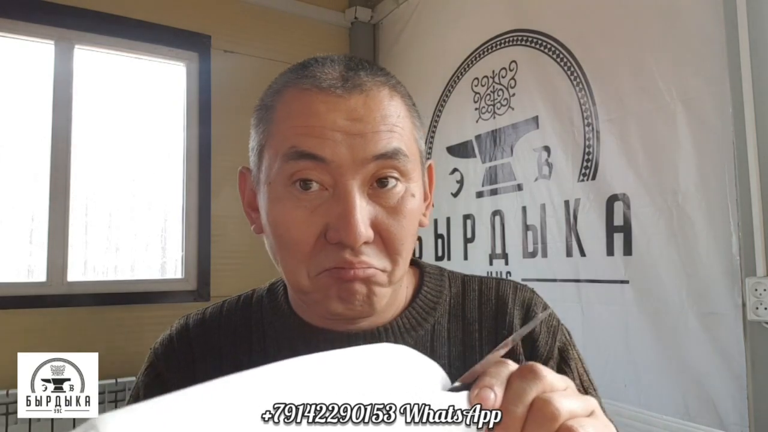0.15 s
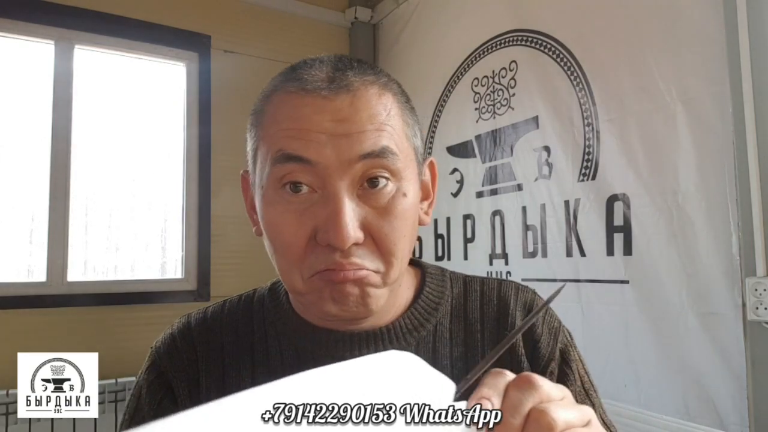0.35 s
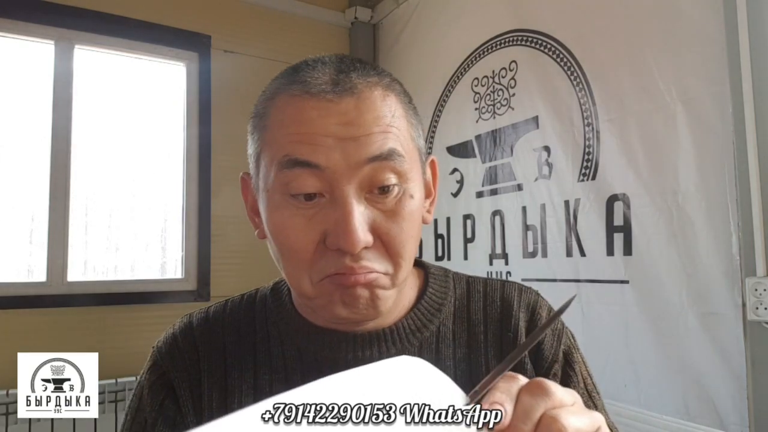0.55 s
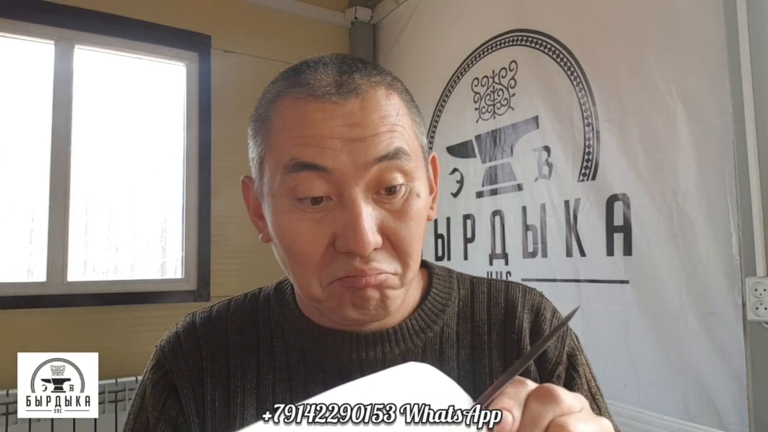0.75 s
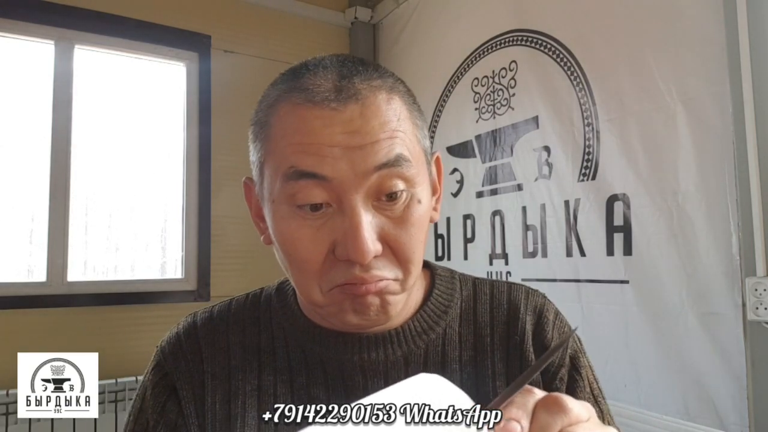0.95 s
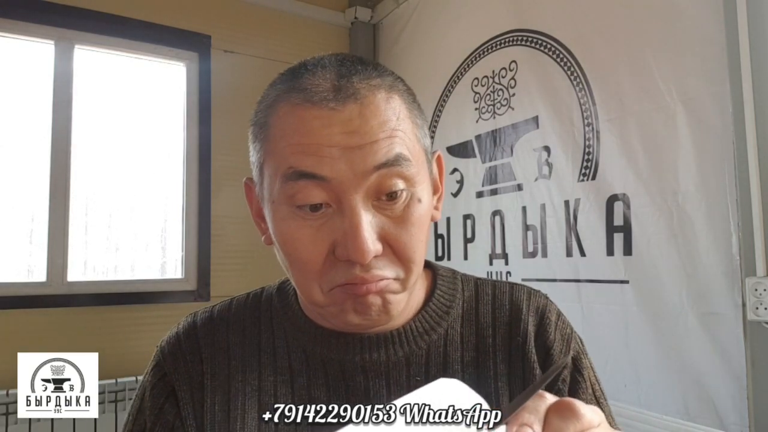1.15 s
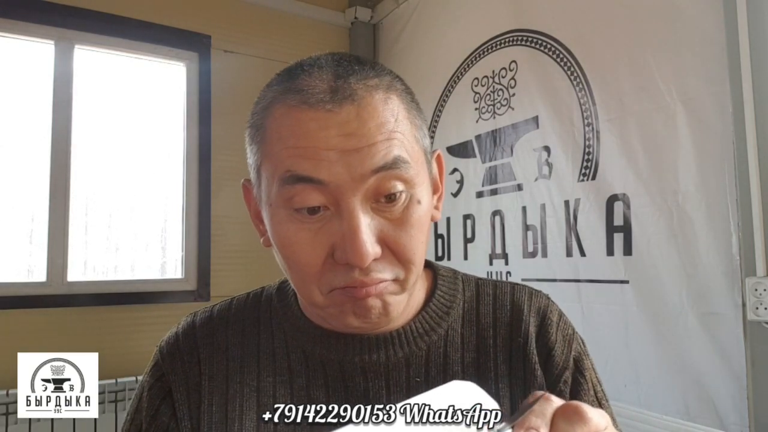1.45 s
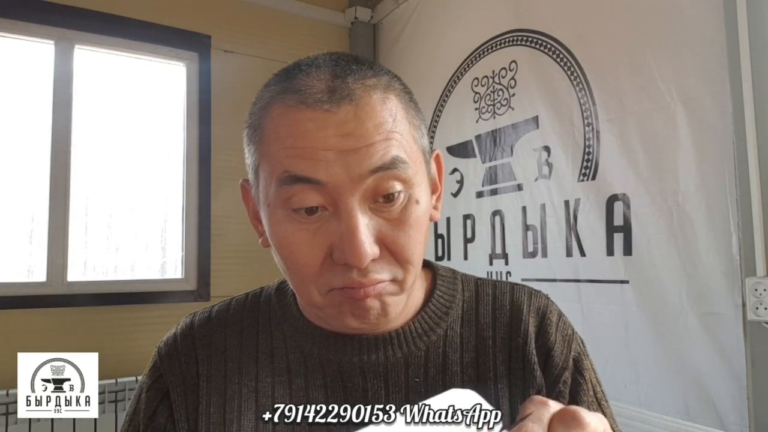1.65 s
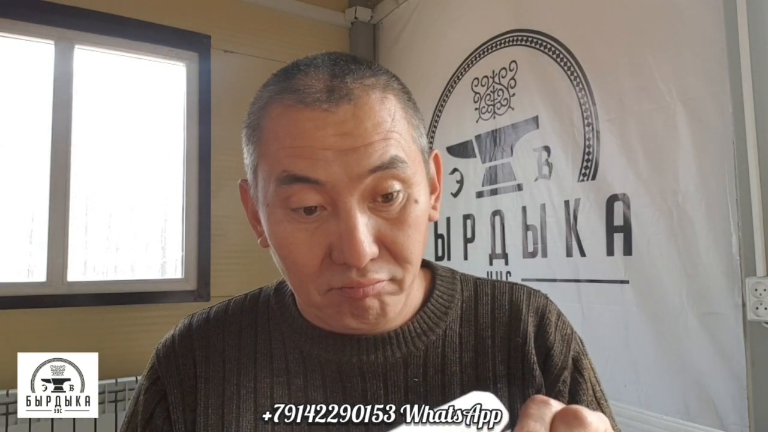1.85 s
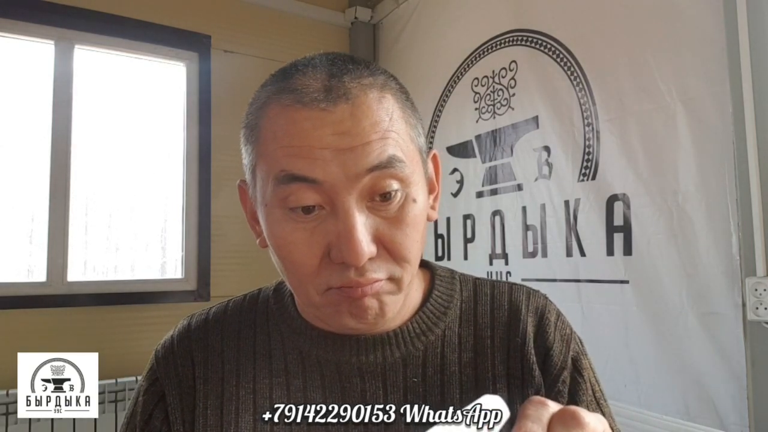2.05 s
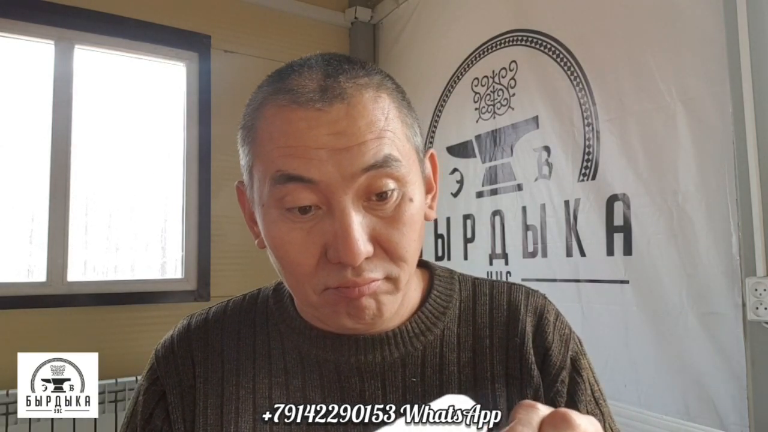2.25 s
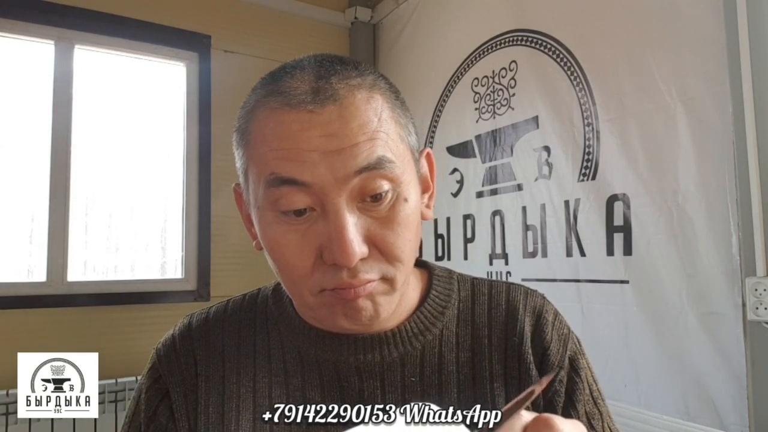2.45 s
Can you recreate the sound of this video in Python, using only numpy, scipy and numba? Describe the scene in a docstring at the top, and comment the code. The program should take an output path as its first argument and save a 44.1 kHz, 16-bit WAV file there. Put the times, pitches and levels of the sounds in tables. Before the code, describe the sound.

A knife blade skids on a held paper sheet, snaps off, then slices through in a long stuttering stroke

```python
"""Knife through held paper

A knife is tried on a hand-held sheet of paper in a small room, close and a little to the left.
The blade skids along the edge and snaps off it, then slices through in one long stroke that stutters halfway.
Random clicks of parting fibres drive the sheet's resonances; skids, rubs and flicks are filtered friction
and bursts of noise, with soft knocks of the hand. Decaying noise makes the room, over a low rumble."""
import sys
import numpy as np
from scipy import signal
from scipy.fft import rfft, irfft
from scipy.io import wavfile
from numba import njit

SR = 44100
rng = np.random.default_rng(int(sys.argv[2]) if len(sys.argv) > 2 else 0)


def to_wav(s):
    """Save 16-bit WAV."""
    ch = np.atleast_2d(s).T  # columns
    pcm = np.round(np.clip(ch, -1, 1) * 32767)  # PCM
    wavfile.write(sys.argv[1], SR, pcm.astype(np.int16))


N = 114660  # length [samples]
MID_TO_SIDES = np.array([[1], [-1]])  # opposite signs in left and right


def undb(db):
    """Amplitude ratio of a level in decibels."""
    return 10 ** (np.asarray(db) / 20)


def unit(x):
    """Normalisation to an rms value of 1."""
    return x / np.sqrt(np.mean(x ** 2))


def clock():
    """Time axis in seconds."""
    return np.arange(N) / SR


def curve(table, axis=1):
    """Linear interpolation in time of one column of a table."""
    rows = np.array(table)
    return np.interp(clock(), rows[:, 0], rows[:, axis])


def freqs():
    """Frequency axis in Hz of the zero-padded spectrum, kept above zero."""
    return np.maximum(np.arange(N + 1) * SR / (2 * N), 1)


def filt(x, gain):
    """Linear filtering: the spectrum is multiplied by a frequency response."""
    return irfft(rfft(x, 2 * N, axis=-1) * gain, axis=-1)[..., 0:N]


def colour(points):
    """Minimum-phase response through (frequency [Hz], level [dB]), by folding the cepstrum."""
    hz, db = np.array(points).T
    level_db = np.interp(np.log(freqs()), np.log(hz), db)
    cepstrum = irfft(np.log(undb(level_db)))
    cepstrum[1:N] *= 2
    cepstrum[N + 1:] = 0
    return np.exp(rfft(cepstrum))


def resonance(hz, width_hz):
    """Response of a damped resonator, with gain 1 at its centre."""
    return 1 / (1 + 1j * (freqs() ** 2 - hz ** 2) / (freqs() * width_hz))


def low_cut(hz, order=8):
    """Zero-phase high-pass response with a steep slope."""
    return 1 / np.sqrt(1 + (hz / freqs()) ** order)


def walk(rate):
    """Slow random modulation of rms 1: random values, rate per second, joined by lines."""
    return unit(np.interp(clock() * rate, np.arange(4096), rng.standard_normal(4096)))


def pan(x, db):
    """Intensity stereophony: left exceeds right by db, with the mean gain held at 1."""
    gains = undb(MID_TO_SIDES * db / 2)
    return x * gains / gains.mean(axis=0)


def gate(start, length, attack, release):
    """Envelope of a linear rise centred on the start, a hold and an exponential decay."""
    t = clock() - start
    rise = np.clip(t / attack + .5, 0, 1)
    return rise * np.exp(-np.maximum(t - length, 0) / release)


# The sheet radiates treble from many separate patches, so the sides agree less as frequency rises
LIKENESS, LIKENESS_HZ = 0.52, 1940  # likeness at the lowest frequencies; frequency where it halves


def spread(pair):
    """Partial coherence: two unrelated signals become sides most alike in the bass."""
    alike = LIKENESS / (1 + freqs() / LIKENESS_HZ)
    middle = filt(pair[0], np.sqrt(1 + alike))
    side = filt(pair[1], np.sqrt(1 - alike))
    return middle + side * MID_TO_SIDES


def fibres(per_s, spread_db):
    """Shot noise: dense tiny clicks of uneven size as fibres catch and part."""
    sizes = undb(spread_db * np.minimum(rng.exponential(size=(2, N)), 4))
    clicks = rng.random((2, N)) < per_s / SR
    signs = np.sign(rng.standard_normal((2, N)))
    return unit(spread(clicks * sizes * signs))


@njit
def moving_band(x, hz, width):
    """State-variable resonator: a band-pass whose centre moves."""
    y, band, low = np.empty(len(x)), 0., 0.
    for i in range(len(x)):
        g, damping = np.tan(np.pi * hz[i] / SR), width / hz[i]
        v = (band + g * (x[i] - low)) / (1 + g * (g + damping))
        band, low, y[i] = 2 * v - band, low + 2 * g * v, damping * v
    return y


# Course of the rumble before its random swell: (time [s], level [dB])
RUMBLE_LEVEL = [(0, -68), (.15, -69), (.27, -61), (.37, -51), (.47, -70.5), (1.0, -67.5), (1.5, -66),
                (1.98, -70), (2.03, -58), (2.075, -70), (2.12, -60), (2.27, -65.5), (2.45, -65),
                (2.55, -64.5), (2.59, -54)]
# Spectrum of the rumble: (frequency [Hz], relative spectral level [dB per Hz])
RUMBLE_COLOUR = [(15, -20.5), (28, -15.5), (42, 2.5), (60, -6.5), (100, -18.5), (200, -33.5), (400, -32),
                 (1500, -64), (16000, -71)]
# Spectrum of the steady hiss: (frequency [Hz], relative spectral level [dB per Hz])
AIR_COLOUR = [(40, -7.5), (120, -3.5), (300, -22.5), (1000, -17), (4000, -21.5), (16000, -46)]
AIR_DB = -72.5


def rumble(swell_db=1.5, side_db=-11):
    """Amplitude-modulated low noise: a wavering rumble with a faint steady hiss above it."""
    mid, side = unit(filt(rng.standard_normal((2, N)), colour(RUMBLE_COLOUR)))
    swell = undb(curve(RUMBLE_LEVEL) + swell_db * walk(4.51))
    low = (mid + undb(side_db) * side * MID_TO_SIDES) * swell
    air = undb(AIR_DB) * unit(filt(spread(rng.standard_normal((2, N))), colour(AIR_COLOUR)))
    return pan(low, db=4.0) + pan(air, db=8.5)


# Light skids of the blade on the paper's edge:
# (start [s], end [s], level at start [dB], level at end [dB], low cut [Hz])
SKIDS = [(-.02, 0.051, -43.5, -53, 1000), (0.057, 0.162, -51, -50, 1030), (0.17, 0.334, -49, -47, 1010),
         (0.341, 0.41, -42, -53, 850), (0.412, 0.555, -60.5, -60, 1500), (0.544, 0.62, -69.5, -71, 1500),
         (0.612, 0.668, -58, -65, 1150), (0.673, 0.805, -65.5, -76, 1200), (2.136, 2.269, -67, -52.5, 2510),
         (2.273, 2.388, -57.5, -51, 2850), (2.39, 2.52, -63.5, -68.5, 5000),
         (2.486, 2.54, -55.5, -58.5, 7750), (2.543, 2.637, -60, -50.5, 5400)]
# Spectrum of the scratch before the low cut: (frequency [Hz], relative spectral level [dB per Hz])
SKID_COLOUR = [(300, 15), (1000, -7.5), (1600, -8), (2200, -4), (4200, -3.5), (6500, -2.5), (8500, -2.5),
               (11000, -3), (13500, -7.5), (16000, -7)]
SKID_PAN_DB = 6.5


def skids(attack_s=0.011, release_s=0.0043):
    """Sliding friction: the blade rides on the edge without biting, a fine scratch thinned by a low cut."""
    scratch = filt(fibres(per_s=7800, spread_db=3.5), colour(SKID_COLOUR)) * undb(1.05 * walk(90))
    out = 0
    for start, end, start_db, end_db, cut_hz in SKIDS:
        level = undb(np.interp(clock(), [start, end], [start_db, end_db]))
        touch = level * gate(start, end - start, attack_s, release_s)
        out = out + touch * unit(filt(scratch, low_cut(cut_hz)))
    return pan(out, SKID_PAN_DB)


# Rubs of the bending sheet, with one short burst just before the snap and faint narrow whistles:
# (start [s], length [s], level [dB], centre at start [Hz], centre at end [Hz], width [Hz])
RUBS = [(0, 0.04, -54.5, 1780, 1750, 700), (0.167, 0.052, -55, 1600, 2080, 980),
        (0.254, 0.078, -53.5, 1970, 1590, 980), (0.329, 0.025, -56, 1400, 2540, 600),
        (0.3495, 0.002, -37.5, 1410, 1500, 800), (0.393, 0.095, -60.5, 1700, 2200, 1200),
        (0.619, 0.041, -62.5, 1660, 1750, 650), (0.692, 0.046, -76.5, 1700, 1600, 650),
        (2.124, 0.205, -66.5, 2100, 2470, 1136), (2.204, 0.12, -72.5, 1480, 1570, 75),
        (2.337, 0.1, -72.5, 1720, 1840, 161), (2.376, 0.0088, -60.5, 2630, 2630, 50),
        (2.568, .04, -67, 3270, 3200, 1193)]


def rubs(attack_s=0.006, release_s=0.024, pan_db=7, judder_db=1):
    """Driven resonance: uneven clicks excite one band, wide or narrow, whose centre may glide."""
    grip = filt(fibres(per_s=5500, spread_db=4), low_cut(hz=985)) * undb(judder_db * walk(110))
    out = 0
    for start, length, db, start_hz, end_hz, width in RUBS:
        hz = np.interp(clock(), [start, start + length], [start_hz, end_hz])
        ring = unit(np.array([moving_band(side, hz, float(width)) for side in grip]))
        out = out + undb(db) * gate(start, length, attack_s, release_s) * ring
    return pan(out, pan_db)


# Snaps and flicks of the sheet: (time [s], level of the burst's drive [dB], decay time constant [s])
SNAPS = [(0.022, -54, 0.078), (0.3657, -24.5, 0.0036), (0.38, -45.5, 0.0033), (0.529, -55.5, 0.0058),
         (0.619, -60, 0.0066), (2.354, -55, 0.03), (2.385, -52.5, 0.0046)]
# Spectrum of a snap: (frequency [Hz], relative spectral level [dB per Hz])
SNAP_COLOUR = [(60, -12.5), (200, -15), (310, -27), (450, -12.5), (700, -8), (1000, -8.5), (1450, -2),
               (2400, -2), (3300, -4), (5200, -12), (6000, -16), (7500, -12), (8500, -27), (16000, -43)]
SNAP_HOLD_S, SNAP_PAN_DB = 0.0029, 5


def snaps(click_db=14):
    """Impulsive buckling: one sharp click, then a held and decaying burst as the sheet springs back."""
    t = clock()
    push, click = 0, 0
    for start, db, decay in SNAPS:
        fall = np.exp(-np.maximum(t - start - SNAP_HOLD_S, 0) / decay)
        push = push + undb(db) * (t >= start) * fall
        click = click + undb(db + click_db) * (np.arange(N) == int(start * SR))
    noise = unit(spread(np.sign(rng.standard_normal((2, N)))))
    crack = click + push * noise
    response = colour(SNAP_COLOUR)
    response = response / np.sqrt(np.mean(np.abs(response) ** 2))
    return pan(filt(crack, response), SNAP_PAN_DB)


# Soft knocks of the hand on the sheet: (time [s], level [dB])
KNOCKS = [(0.052, -68), (0.089, -73), (0.371, -49.5), (2.362, -64)]
KNOCK_HZ, KNOCK_WIDTH_HZ, KNOCK_DECAY_S = 431, 140, 0.022  # width of each of two equal resonators


def knocks():
    """Damped resonance: hollow low thuds of narrow noise with an exponential decay."""
    t = clock()
    push = sum(undb(db) * (t >= s) * np.exp(-np.abs(t - s) / KNOCK_DECAY_S) for s, db in KNOCKS)
    noise = spread(rng.standard_normal((2, N)))
    thud = unit(filt(noise, resonance(KNOCK_HZ, KNOCK_WIDTH_HZ) ** 2))
    return pan(push * thud, db=20)


BUNDLES_PER_S, BUNDLE_DB, BUNDLE_DECAY_S = 110, 1.5, 0.0012  # level against the steady tearing


def bundles():
    """Random relaxation: bundles of fibres give way, each a sudden, brief surge of the tearing."""
    breaks = (rng.random(N) < BUNDLES_PER_S / SR) * rng.random(N)
    surges = signal.lfilter([1], [1, -np.exp(-1 / (SR * BUNDLE_DECAY_S))], breaks)
    return unit(1 + undb(BUNDLE_DB) * surges)


FIBRES_PER_S, FIBRE_SPREAD_DB = 9000, 0.5
COLOUR_CHANGE_S = (1.45, 2.05)  # start and end of the change from early to late
MODES_DB, MODES_FADE_DB = -6.5, 7  # ring against sheet; it weakens by the fade as the cut frees the sheet
BITE_S, BITE_HZ = (0.95, 1.024), 1005  # the bass comes in as the blade goes deeper
RASP_DB, RASP_HZ = -1, 157  # the blade catches unevenly, shaking the sheet's resonances
JERK_ATTACK_S, JERK_RELEASE_S = 0.00096, 0.0031
CUT_PAN_DB, PAN_DRIFT_DB = 7.5, 3.5  # the blade moves towards the middle as it cuts
CUT_TRIM_DB = -1.5  # applied to body and hiss alike
# Force of the cut, before jerks and surges: (time [s], level [dB])
CUT_FORCE = [(.7, -100), (.78, -78), (.83, -61.5), (.95, -48.5), (1.005, -46.5), (1.05, -43), (1.14, -36.5),
             (1.18, -39.5), (1.215, -37), (1.3, -40), (1.41, -44.5), (1.503, -40.5), (1.518, -52),
             (1.56, -58), (1.672, -53.5), (1.693, -48), (1.73, -45.5), (1.815, -35), (1.865, -38),
             (1.89, -36), (1.905, -41), (1.94, -37), (1.975, -44), (2.005, -33.5), (2.024, -37.5),
             (2.038, -42), (2.065, -53.5), (2.1, -62), (2.2, -100)]
# Short jerks where the blade sticks and goes on: (start [s], length [s], added level [dB])
JERKS = [(1.021, 0.0099, -58), (1.144, 0.0022, -47), (1.53, 0.011, -45), (1.578, 0.016, -48),
         (1.63, 0.019, -51), (1.638, 0.015, -50), (1.841, .003, -47), (1.921, 0.0022, -42),
         (1.957, .003, -39.5), (1.969, .002, -46)]
# The sheet's colour early in the cut: (frequency [Hz], relative spectral level [dB per Hz])
SHEET_EARLY = [(100, -21), (250, -20), (450, -19.5), (750, -7.5), (1000, -4), (1600, -5), (3000, -6.5),
               (3700, -5.5), (4700, -2), (5600, -5.5), (6600, -5), (8800, -7), (13000, -7.5), (16000, -10)]
# The sheet's colour late in the cut: (frequency [Hz], relative spectral level [dB per Hz])
SHEET_LATE = [(100, 0), (290, -14), (430, -1.5), (700, -4), (1000, -3), (1600, 1.5), (2200, 0.5),
              (3000, 3.5), (4400, 7), (5700, 0), (7200, 3.5), (8700, -1.5), (9700, -3), (13500, -5.5),
              (16000, -5)]
# Resonances of the sheet: (centre [Hz], width [Hz], relative gain [dB])
SHEET_MODES = [(423, 37, -5), (980, 270, -3.5), (1610, 390, 6.5), (2250, 590, 13.5), (2870, 390, 8)]
# Sharp hiss at the cutting edge:
# (time [s], centre [Hz], level against the cut before the trim [dB], lean to the left [dB])
EDGE = [(.85, 10800, -9.5, 27), (1.12, 10200, -9.5, 21), (1.28, 11100, -6, 13), (1.38, 11600, -8, 13),
        (1.48, 12240, -0.5, 13), (1.65, 11800, -8, 13), (1.71, 12400, -15, 12), (1.82, 11160, -2.5, 8),
        (1.93, 11100, -7, 21), (1.98, 11900, -22, 6), (2.02, 11600, -9.5, 21), (2.08, 11280, -10, 5)]


def cut(edge_width_hz=2900):
    """Source and resonator: parting fibres drive the sheet and hiss at the edge, under a juddering force."""
    force = undb(curve(CUT_FORCE))
    for start, length, db in JERKS:
        force = force + undb(db) * gate(start, length, JERK_ATTACK_S, JERK_RELEASE_S)
    force = force * bundles()

    tear = fibres(FIBRES_PER_S, FIBRE_SPREAD_DB)
    late = np.interp(clock(), COLOUR_CHANGE_S, [0, 1])
    early_sheet = unit(filt(tear, colour(SHEET_EARLY)))
    late_sheet = unit(filt(tear, colour(SHEET_LATE)))
    sheet = (1 - late) * early_sheet + late * late_sheet

    modes = sum(undb(db) * resonance(hz, width) for hz, width, db in SHEET_MODES)
    ring = unit(filt(tear * undb(RASP_DB * walk(RASP_HZ)), modes))
    body = undb(CUT_TRIM_DB) * (sheet + undb(MODES_DB - MODES_FADE_DB * late) * ring)
    depth = np.interp(clock(), BITE_S, [0, 1])
    body = depth * body + (1 - depth) * filt(body, low_cut(BITE_HZ))

    hz, width = curve(EDGE), float(edge_width_hz)
    edge_tear = fibres(FIBRES_PER_S, FIBRE_SPREAD_DB)
    # two passes make the band's skirts steeper
    hiss = unit(np.array([moving_band(moving_band(side, hz, width), hz, width) for side in edge_tear]))
    hiss_level = undb(curve(EDGE, axis=2) + CUT_TRIM_DB)
    panned_hiss = pan(hiss, curve(EDGE, axis=3)) * hiss_level
    return force * (pan(body, CUT_PAN_DB - PAN_DRIFT_DB * late) + panned_hiss)


RIPPLE_DB, RIPPLE_SPACING_HZ = 3, 149.5  # spread and spacing of the random peaks and dips
FLEX_PER_S = 5.4  # new ripple patterns per second


def flexing(x):
    """Modal ripple: many small resonances of the sheet, which shift as it bends and the cut grows."""
    out, place = 0, clock() * FLEX_PER_S
    for k, heights in enumerate(rng.standard_normal((16, 2, 1024))):
        ripple = [np.interp(freqs() / RIPPLE_SPACING_HZ, np.arange(len(h)), h) for h in heights]
        db = RIPPLE_DB * np.array(ripple)
        share = np.maximum(1 - np.abs(place - k), 0)  # crossfade between neighbouring patterns
        if share.any():
            # the ripple fades out towards the bass
            out = out + share * filt(x, unit(undb(db * low_cut(hz=760))))
    return out


# Diffuse reverberation: (band centre [Hz], level [dB], time to decay by 60 dB [s])
ROOM = [(100, -9, 0.23), (500, 3.5, 0.36), (970, -1.5, 0.19), (1690, -5, 0.33), (4100, -8, 0.25),
        (7900, -13.5, 0.39), (16000, -20, 0.096)]
# Resonances of the room, some narrow and ringing, some wide and brief:
# (centre [Hz], width [Hz], gain [dB])
ROOM_MODES = [(456, 59, 5), (802, 12, -0.5), (949, 28, -11), (1302, 11.7, -13), (1500, 14, 1.5),
              (1642, 83, -1), (2295, 85, -2.5), (2934, 76, -3)]
ROOM_DELAY_S = 0.0077


def room(x):
    """Diffuse-field reverberation: noise decaying band by band, beside discrete room modes."""
    hz, db, t60 = np.array(ROOM).T
    noise, t, tail = rng.standard_normal((2, N)), clock() - ROOM_DELAY_S, 0
    for share, level, decay in zip(np.eye(len(hz)), undb(db), t60):
        fade = (t > 0) * np.exp(-np.log(1000) * np.abs(t) / decay)
        fade = fade / np.sqrt(np.sum(fade ** 2))
        band = filt(noise, np.interp(np.log(freqs()), np.log(hz), share))
        tail = tail + level * band * fade
    modes = sum(undb(gain) * resonance(f, width) for f, width, gain in ROOM_MODES)
    mono = x.mean(axis=0)
    return pan(filt(mono, rfft(tail, 2 * N)), db=1.5) + pan(filt(mono, modes), db=2.5)


def scene():
    """Superposition: the paper's direct sound, its reverberation and the rumble add."""
    paper = flexing(cut() + skids() + rubs()) + snaps() + knocks()
    return paper + room(paper) + rumble()


TOP_HZ = 15900


def record(dry):
    """Band limitation: a steep elliptic low-pass removes the extreme treble."""
    return signal.sosfilt(signal.ellip(10, .2, 80, TOP_HZ, fs=SR, output="sos"), dry)


dry = scene()
out = record(dry)
to_wav(out)
```